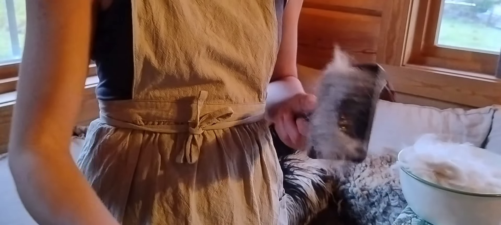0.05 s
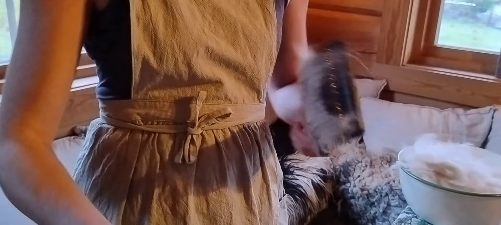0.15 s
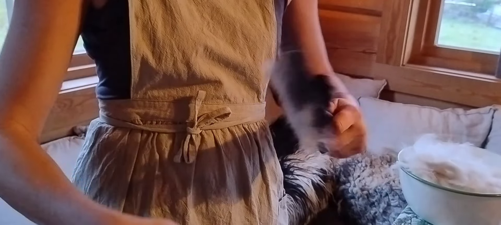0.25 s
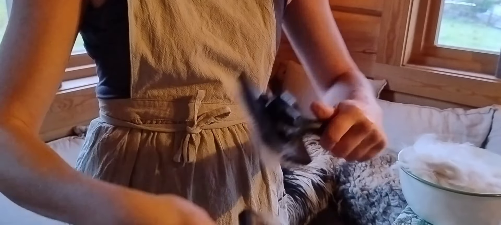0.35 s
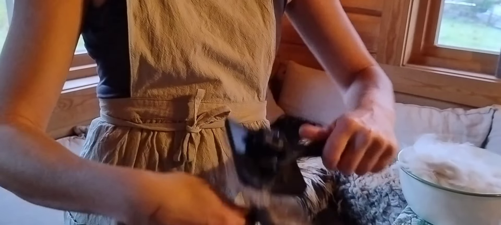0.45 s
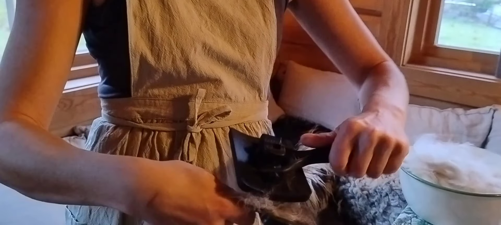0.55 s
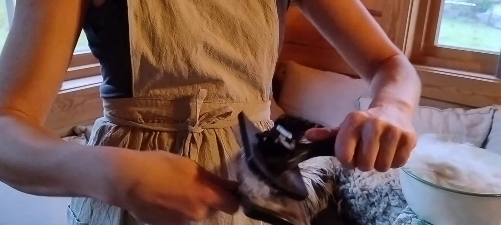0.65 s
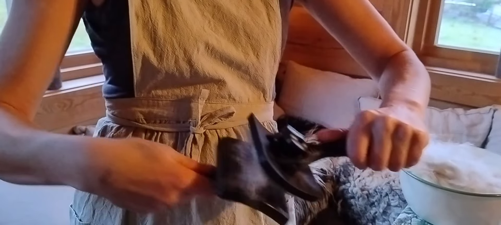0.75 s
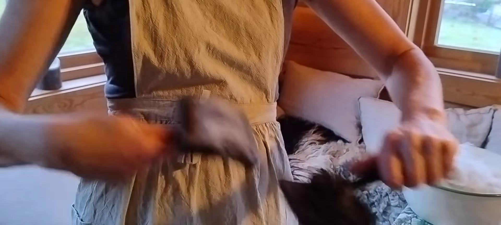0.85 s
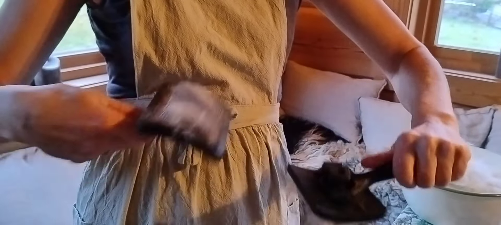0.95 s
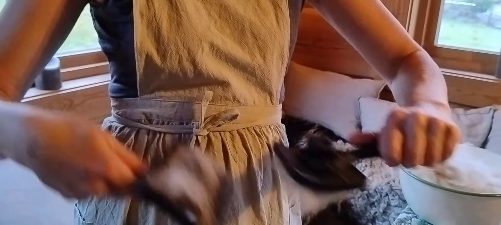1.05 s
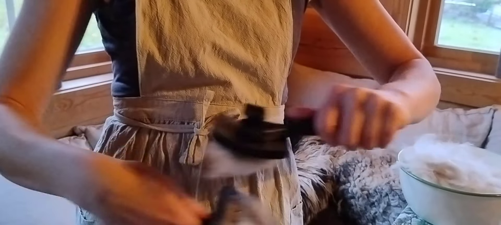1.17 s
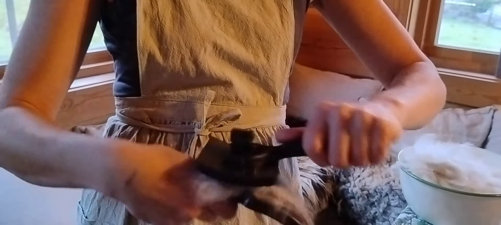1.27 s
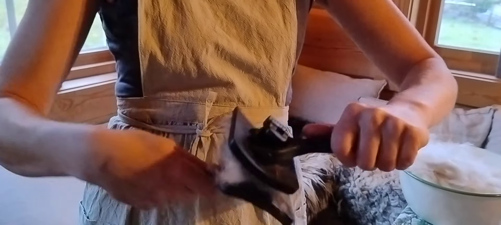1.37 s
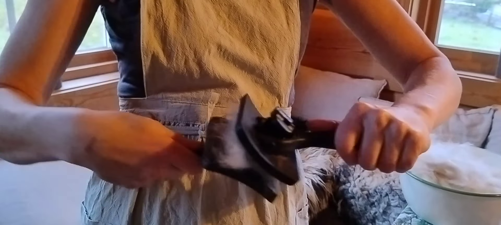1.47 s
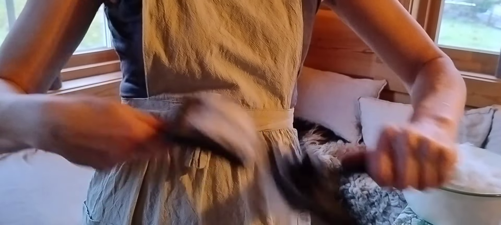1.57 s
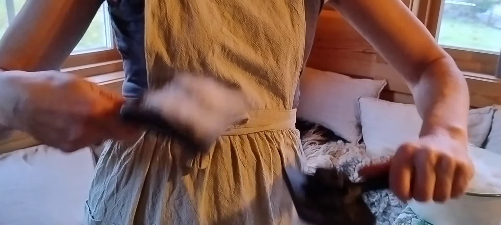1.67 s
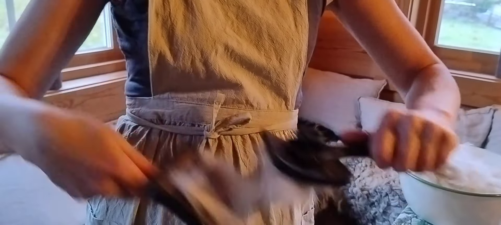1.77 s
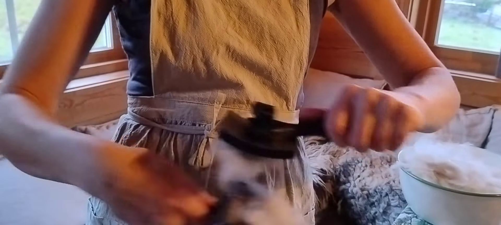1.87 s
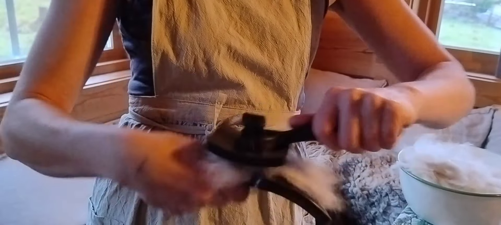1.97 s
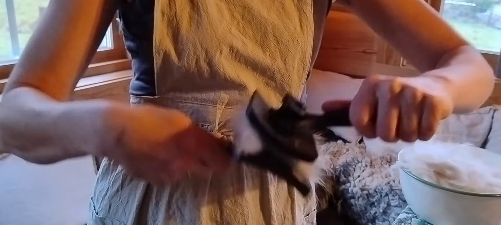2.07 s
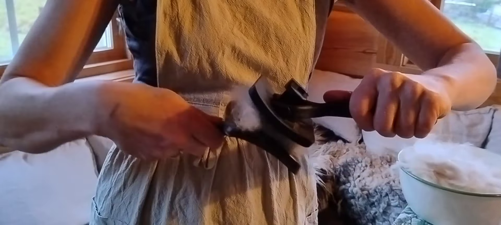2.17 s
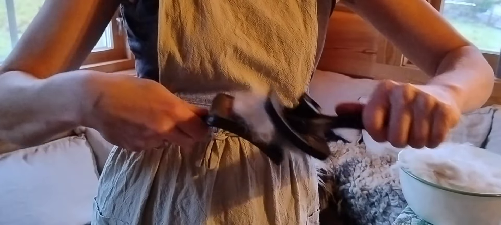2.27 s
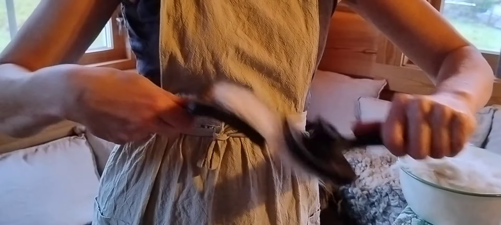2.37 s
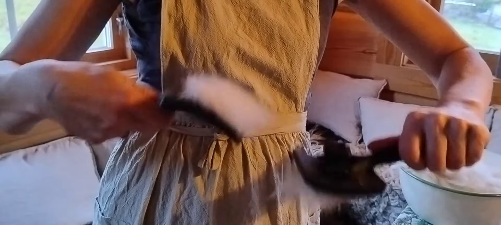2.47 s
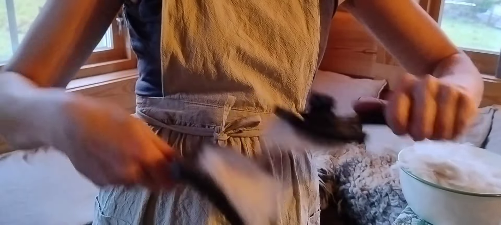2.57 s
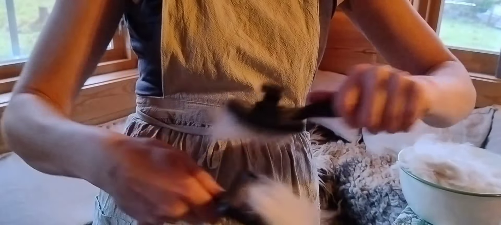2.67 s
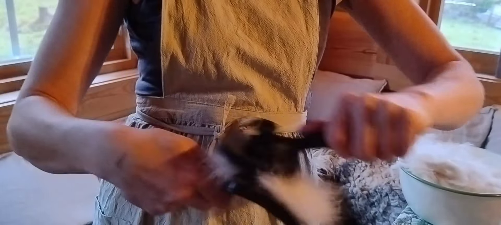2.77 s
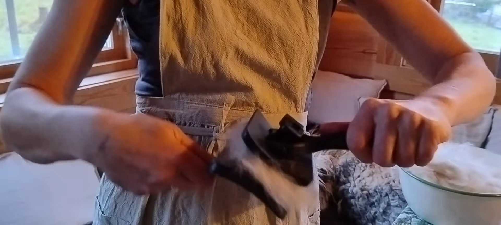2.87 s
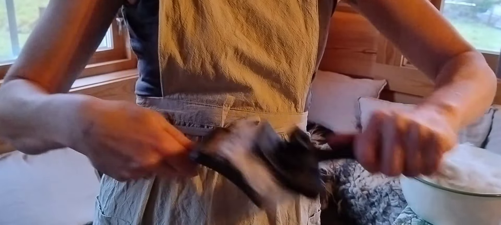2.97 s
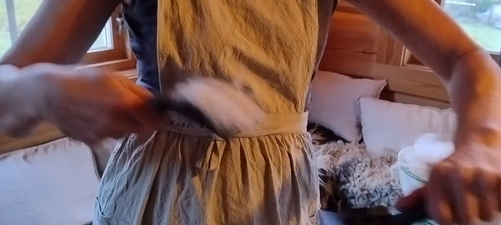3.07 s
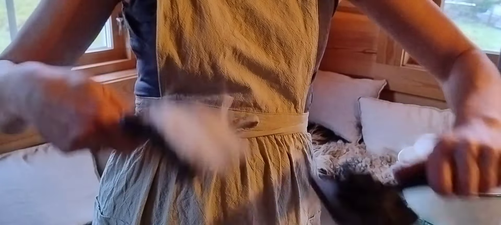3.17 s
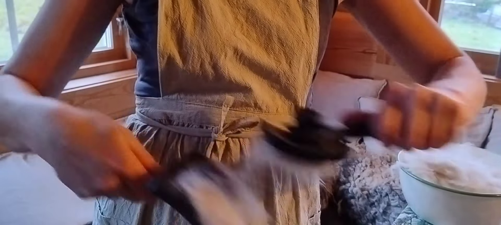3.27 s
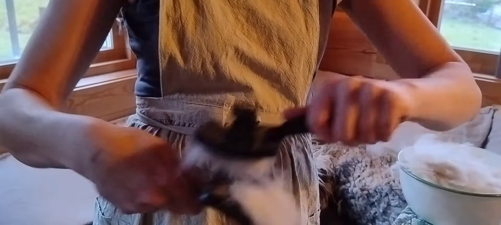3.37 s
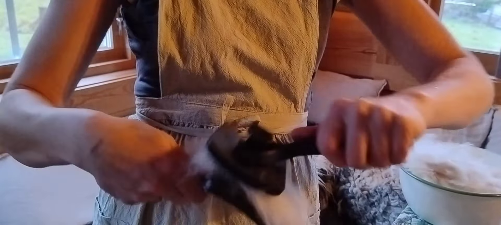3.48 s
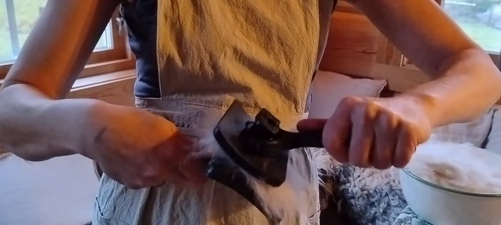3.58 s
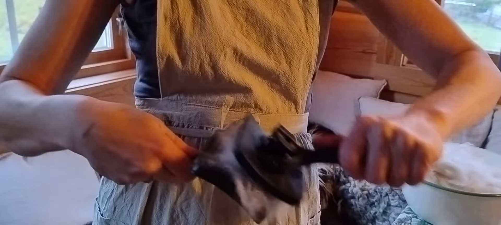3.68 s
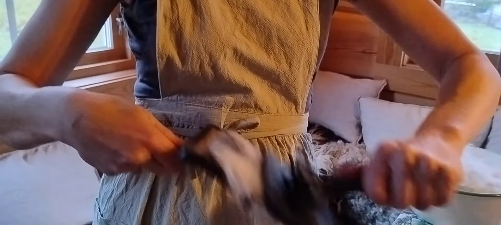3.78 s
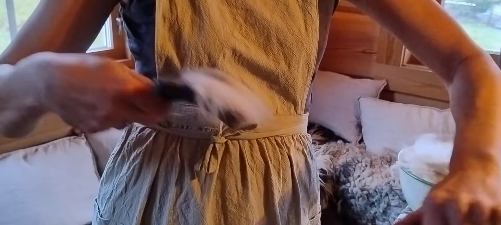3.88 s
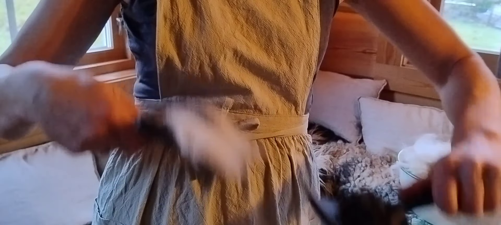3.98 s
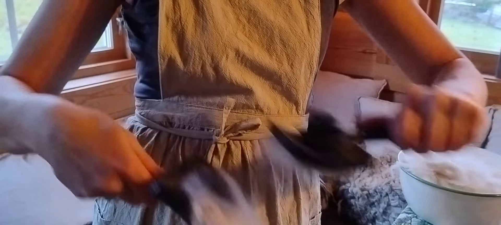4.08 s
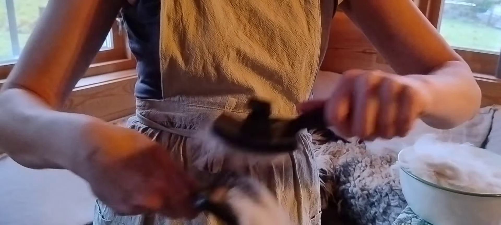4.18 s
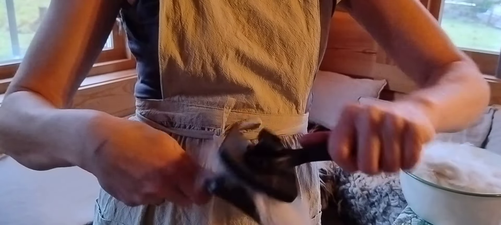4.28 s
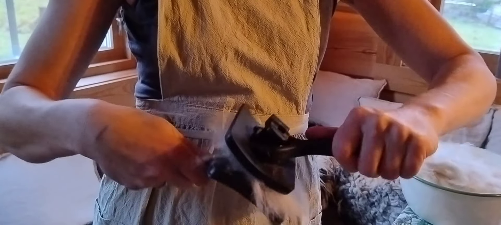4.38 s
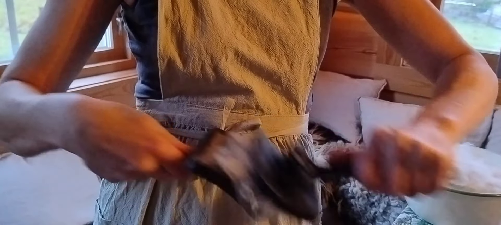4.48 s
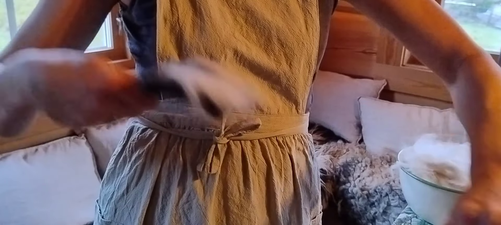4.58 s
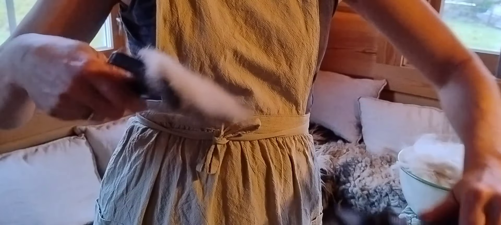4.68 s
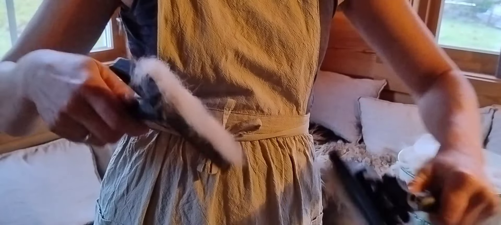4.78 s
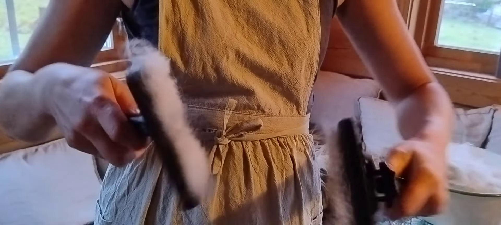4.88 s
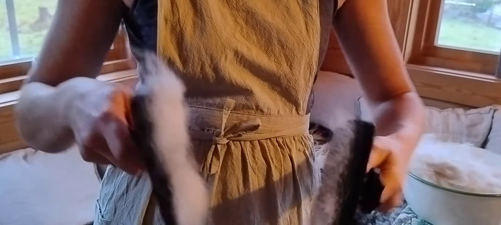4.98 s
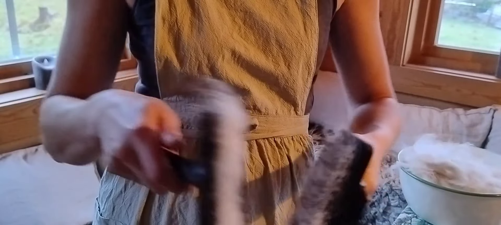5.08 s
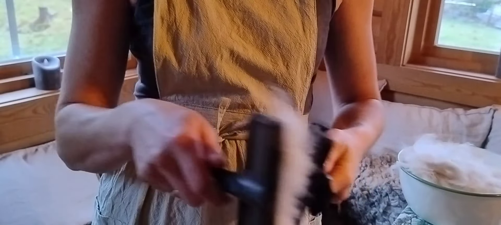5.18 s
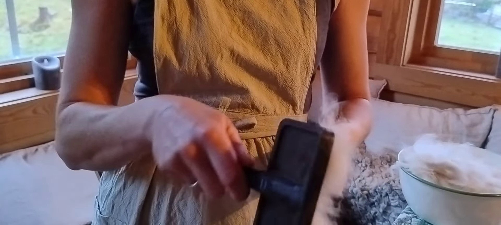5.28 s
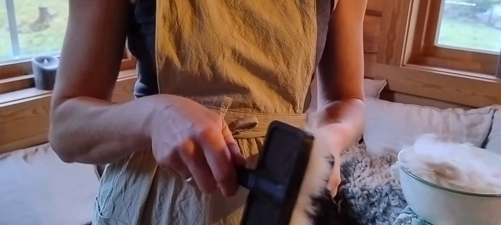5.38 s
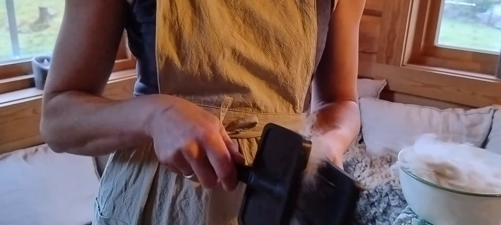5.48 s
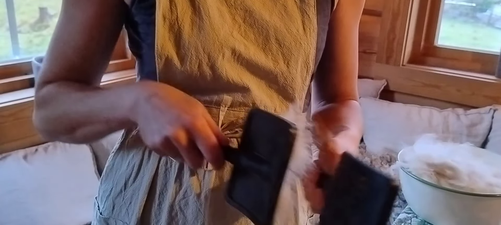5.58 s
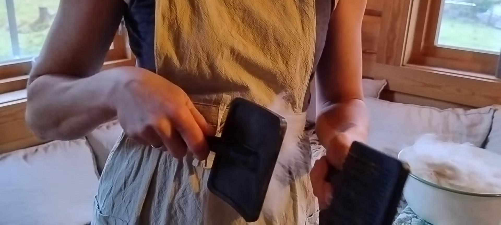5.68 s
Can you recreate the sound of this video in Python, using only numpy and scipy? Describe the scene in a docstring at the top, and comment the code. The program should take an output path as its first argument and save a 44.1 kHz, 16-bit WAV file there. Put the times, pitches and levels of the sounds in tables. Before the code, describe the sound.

Close indoor stereo sound of hand carding with wire brushes. After half a second of quiet come tiny pin grazes, then steady strokes, each clacking, scratching and rasping before a bright release snap. The first two are lighter, the later ones fuller. Quiet gaps show faint cloth rustle, tiny handling creaks and barely audible hum; after a pause, one softer, airy brush glide fades out.

```python
"""Carding fur with two wire-pin brushes

Two brushes card a tuft of fur in a small wooden room, over a low hum, with faint handling and cloth.
In each stroke they clack, the pins scrape in, are drawn back through the fur and let go with a snap;
a last stroke glides. Scrapes are random pin flicks, clacks and snaps are short noise forces, each
passed through a resonant colour; tones are wavering sines, and rustle and air are coloured noise."""
import sys
import numpy as np
from scipy import signal
from scipy.fft import rfft, irfft
from scipy.io import wavfile
from scipy.ndimage import uniform_filter1d

SR = 44100
rng = np.random.default_rng(int(sys.argv[2]) if len(sys.argv) > 2 else 0)


def bounce(signal):
    """Save signal as a 16-bit WAV file at the path given by the first command-line argument."""
    frames = np.transpose(np.atleast_2d(signal))
    limited = np.clip(frames, -1, 1)
    pcm = np.round(limited * 32767).astype(np.int16)
    wavfile.write(sys.argv[1], SR, pcm)


N = 253134
TIME = np.arange(N) / SR  # s

# All table levels are relative: colours, stroke levels and the microphones act on them later.
# Pins push into each other: (start t/s, length t/s, level/dB, sag over length/dB, treble/dB,
# share of bare tips)
PUSHES = [(0.918, 0.029, -28.5, 18, 4.5, 0.31), (1.371, 0.1, -36.5, -3, -5, 0.11),
          (2.062, 0.12, -29, 2.5, -4.5, .1), (2.845, 0.11, -24, 8.5, -6.5, 0.82),
          (3.518, 0.09, -21, 15.5, -4, 0.47), (4.332, 0.11, -26, 16.5, -5.5, 0.94)]
# Pins are drawn back through the fur: (start t/s, swell t/s, hold t/s, release t/s, level/dB,
# treble/dB, treble flare/dB)
PULLS = [(0.738, 0.021, 0.14, 0.14, -42, -7, 8), (1.485, .115, 0.049, 0.22, -38.5, -6.5, 5),
         (2.236, 0.07, 0.078, .33, -34, -5, 1.5), (3.004, .052, .055, 0.096, -30.5, -4, 2),
         (3.683, .07, .155, .11, -30, -5, 5), (4.486, 0.09, 0.021, 0.2, -27.5, -5.5, 6.5)]
# The last, gliding stroke meets the pins, then lifts the fur off them: (columns as in PULLS)
LIFTS = [(5.352, .024, 0.016, 0.42, -40, -1, 4.5), (5.447, 0.092, 0.064, 0.099, -33, -2.5, 0.5)]
# A few pins graze in passing: (centre t/s, length t/s, level/dB, treble/dB)
GRAZES = [(0.596, .012, -47, -2), (0.673, 0.02, -47, 0), (0.702, .03, -50.5, -1.5), (0.749, 0.012, -39, -8),
          (0.915, 0.018, -31, -14.5), (1.446, .022, -40.5, 3), (3.908, .022, -30.5, 5),
          (5.343, 0.027, -57.5, 4.5)]
# Brushes meet, or a pin catches: (t/s, level/dB, length t/ms, tilt/dB per octave above 1 kHz,
# ring of the plastic back/dB)
CLACKS = [(0.7469, -28.5, 0.25, -1, -2.5), (0.9288, -14, 1, 13.5, 7), (1.3866, -20, 0.93, 0, 1.5),
          (2.0755, -13.5, 0.47, 4, -1), (2.0810, -18, .3, 1.5, -0.5), (2.8588, -18, .27, -0.5, 7),
          (2.8610, -23, 0.32, 1.5, 0.5), (2.8662, -13.5, 0.32, 4, -1.5), (2.9040, -22.5, 0.13, 0, -5),
          (3.5286, -18.5, 0.58, -4, -3.5), (3.5329, -12.5, 0.53, 2, -1), (3.7265, -27.5, 0.2, 3, 5),
          (4.3465, -10.5, .4, 1.5, -1.5)]
# The last pins let go: (columns as in CLACKS)
SNAPS = [(0.9713, -20.5, 1, -2, -3), (1.7261, -13, .5, -1, -1), (2.5305, -19, .9, -2.5, -5.5),
         (3.1650, -13.5, .5, -1, 1), (3.9530, -12.5, 0.93, -0.5, 1.5), (4.6623, -12, .6, -0.5, -3.5)]
# Colours of the pushing, pulling and gliding pins: (f/Hz, level/dB per Hz)
PUSH_COLOUR = [(240, -51), (400, -20.5), (557, -14), (942, -15), (1030, -5.5), (1110, -14), (1200, -4.5),
               (1370, -5.5), (1570, -3), (1820, -3.5), (2950, -1.5), (7380, -7.5), (8570, -10),
               (13300, -17), (14500, -24)]
PULL_COLOUR = [(240, -49), (400, -14.5), (548, -19.5), (667, -15.5), (1020, -2.5), (1150, -6), (1390, 0),
               (1690, -3), (2000, -0.5), (2950, 1.5), (5220, -5), (7950, -7), (9520, -14), (12300, -15.5),
               (14500, -24.5)]
LIFT_COLOUR = [(240, -44), (400, -17), (438, -29), (574, -35), (775, -19.5), (1000, -15.5), (1310, -16),
               (2500, -5), (4040, -11), (5980, -9), (7830, -14.5), (13700, -23.5), (14500, -32)]
# Colours of the brushes as they meet and as they let go: (f/Hz, level/dB per Hz)
CLACK_COLOUR = [(100, -36.5), (400, -31.5), (750, -20), (930, -17.5), (1250, -13.5), (1700, -14),
                (2100, -2), (3200, -6.5), (4500, -1), (6000, -9), (8000, -16.5), (10000, -20),
                (14000, -23.5)]
SNAP_COLOUR = [(40, -37.5), (150, -20.5), (550, -25), (730, -24), (1020, -26.5), (1190, -7), (1330, -10),
               (1620, -15.5), (2000, -3), (2300, 2.5), (3000, -7), (5000, -9), (7500, -12.5),
               (10000, -18.5), (14000, -22)]
# What the knocked pin bed sends out to all sides: (f/Hz, level/dB per Hz)
SPILL_COLOUR = [(100, -30.5), (500, -19), (900, -12), (1200, -3), (1700, -4.5), (2200, -3.5), (3200, -7.5),
                (4500, -3), (7000, -8), (10000, -14.5), (14000, -20.5)]
# Level difference of the microphone pair: (f/Hz, left minus right level/dB)
SIDES = [(60, -2), (1000, -0.5), (2000, 0.5), (3800, 2), (5200, -3), (6200, 1), (8000, -5.5), (10500, -6),
         (14000, -3.5)]
# Early echoes from near surfaces: (delay t/s, left gain, right gain)
ECHOES = [(.0024, .12, 0.033), (.0059, 0.28, 0.095), (.0085, .06, .08), (0.0127, 0.056, 0.055)]
# Decay of the room: (f/Hz, time to fall by 60 dB t/s)
ROOM_DECAY = [(200, 0.47), (1000, 0.056), (2500, 0.27), (5000, 0.21), (9000, 0.2), (14000, 0.15)]
# Rustle of the apron: (t/s, level/dB)
RUSTLE = [(.55, -64.5), (1.3, -57.5), (4.2, -55.5), (4.9, -53.5), (5.2, -60)]
# Colour of the cloth: (f/Hz, level/dB per Hz)
RUSTLE_COLOUR = [(100, -0.5), (900, 6.5), (2200, -3), (4500, -7.5), (8000, -13.5), (14000, -20)]
# Faint creaks of the brushes in the hands: (centre t/s, length t/s, f/Hz, level/dB)
CREAKS = [(0.793, 0.044, 560, -52.5), (0.964, 0.089, 646, -47), (4.758, 0.047, 585, -44.5),
          (4.779, 0.016, 660, -37), (4.817, 0.025, 670, -45), (4.998, 0.033, 650, -40)]
# Soft bumps of handling: (centre t/s, length t/s, f/Hz, level/dB)
BUMPS = [(2.183, 0.029, 150, -55), (2.203, 0.026, 108.2, -48), (2.517, 0.12, 144.6, -50.5)]
# Thin faint tones: (start t/s, end t/s, f/Hz, level/dB, fade/dB per s)
WHINES = [(0, 0.447, 2560, -67.5, 11), (0, .33, 4000, -84, 10), (0, .35, 4900, -88, 10),
          (1.08, 1.4, 2595, -70.5, -2), (1.122, 1.38, 3120, -85, 0), (4.167, 4.335, 3300, -74, -5),
          (4.22, 4.34, 4450, -81, 5.5), (4.955, 5.35, 3260, -77, 9), (4.995, 5.35, 4167, -73.5, 13),
          (5.08, 5.354, 5658, -80, -7)]
# Lines of the machine hum: (f/Hz, level/dB)
HUM = [(84.2, -52), (119, -70), (183, -66), (272, -56), (576, -63)]
# Colour of the air of the room: (f/Hz, level/dB per Hz)
AIR_COLOUR = [(20, -17.5), (50, -8), (90, 0.5), (160, 0.5), (210, 0.5), (295, 5), (370, -7), (560, -3),
              (750, -11.5), (930, -16), (1300, -36), (2200, -29), (4000, -44.5), (14000, -43)]

PUSH_ATTACK_S, PUSH_RELEASE_S = 0.017, 0.23
BITE_S = 0.035  # bare tips ring most at this time after they meet
PULL_SAG_DB_PER_S, SWELL_POWER = 29.5, 1.2
FLARE_S = 0.0092  # half-width of the treble flare, to 1/e
FIZZ_HZ = 5000  # the scrape's treble lies above this
BACK_HZ, BACK_WIDTH_HZ = 2280, 400  # main resonance of a brush back
AIR_DB = -52.5
EDGE_HZ = 14700  # upper band limit


def scrape(strokes, colour, pins_per_s, spread_db, catch_db, lead_ms, width_ms, level_db):
    """Stick-slip friction: wire pins flick past each other at random, catching and slipping in clumps."""
    size = amp(spread_db * np.minimum(rng.exponential(1, N), 4))
    happens = rng.random(N) < pins_per_s / SR
    flicks = size * rng.choice([-1, 1], N) * happens
    clumped = flicks * amp(catch_db * drift(160))
    pins = ring(arrive(clumped, lead_ms, width_ms), colour)
    body = unit_rms(band(pins, 0, FIZZ_HZ))
    fizz = unit_rms(band(pins, FIZZ_HZ, SR))
    tips = band(body, 2900, SR) - 0.3 * body  # more ring, less thrum
    total = np.zeros((2, N))
    for gain, treble_db, bare in strokes:
        total += gain * (body + bare * tips + amp(treble_db) * fizz)
    return amp(level_db) * total


def push(start, length, db, sag_db, treble_db, bite):
    """Damping by immersion: pins hit and quieten as they sink in. Gives gain, treble dB, bare tips."""
    depth = np.maximum(TIME - start, 0) / BITE_S
    bare = bite * depth * np.exp(1 - depth)
    gain = amp(db) * envelope(start, PUSH_ATTACK_S, length, PUSH_RELEASE_S, sag_db)
    return gain, treble_db, bare


def pull(start, swell, hold, release, db, treble_db, flare_db):
    """Sliding friction: the rasp swells, sags, and turns bright just as the pins slip."""
    slipping = np.exp(-((TIME - start - swell - hold) / FLARE_S) ** 2)
    gain = amp(db) * envelope(start, swell, hold, release, PULL_SAG_DB_PER_S * hold)
    return gain, treble_db + flare_db * slipping, 0


def graze(centre, length, db, treble_db):
    """Passing contact: a brief touch that comes and goes evenly, as a Gaussian."""
    return amp(db) * np.exp(-(2 * (TIME - centre) / length) ** 2), treble_db, 0


def envelope(start, attack_s, hold_s, release_s, sag_db):
    """Contact pressure: it builds, sags while held, then dies by 60 dB over each release time."""
    age = TIME - start - attack_s
    rise = np.clip(1 + age / attack_s, 0, 1) ** SWELL_POWER
    sag = amp(-sag_db * np.clip(age / hold_s, 0, 1))
    release = 1e-3 ** (np.maximum(age - hold_s, 0) / release_s)
    return rise * sag * release


def turning(x, patchy_db):
    """Moving radiator: as the brushes turn and slide, their colour shifts in narrow, slow bands."""
    spectrum = signal.stft(x, SR, nperseg=512)[2]
    patches = rng.standard_normal(spectrum.shape[1:])
    patches = uniform_filter1d(patches, size=3, axis=0)  # across frequency
    patches = unit_rms(uniform_filter1d(patches, size=9, axis=1))  # across time
    gain = unit_rms(amp(patchy_db * patches))
    return signal.istft(spectrum * gain, SR, nperseg=512)[1][:, :N]


def knocks(rows, colour, build_ms, build_db, lead_ms, width_ms, level_db, spill_db):
    """Impact excitation: scattered pins surround the bed's burst. Gives direct sound and room spill."""
    near, spill = np.zeros((2, N)), np.zeros(N)
    ms = (np.arange(2048) - 512) * 1000 / SR
    burst = np.sqrt(0.003 * SR / len(ms))  # levels refer to the rms over 3 ms
    for s, db, length_ms, tilt_db, back_db in rows:
        start = s + ms[0] / 1000
        bed = np.exp(-0.5 * (ms / length_ms) ** 2)
        bed = bed + amp(build_db) * np.exp(-abs(ms) / build_ms)
        force = arrive(bed * rng.standard_normal(len(ms)), lead_ms, width_ms)
        lines = rfft(force)
        force = irfft(lines / abs(lines) ** 0.21)  # so many pins hardly favour a pitch
        force = force * np.exp(-(ms / 5.5) ** 2)
        struck = unit_rms(ring(force, colour, tilt_db, back_db))
        for channel, sound in enumerate(struck):
            add(near[channel], start, amp(db + level_db) * burst * sound)
        impulse = signal.unit_impulse(len(ms))
        spread = unit_rms(ring(impulse, SPILL_COLOUR, tilt_db, back_db)[0])
        add(spill, s, amp(db + spill_db) * burst * spread)
    return near, spill


def ring(x, colour, tilt_db=0, back_db=0, size=2048):
    """Minimum-phase resonance: a coloured body rings only after it is struck."""
    hz = abs(np.fft.fftfreq(size, 1 / SR))
    back = back_db * np.exp(-((hz - BACK_HZ) / BACK_WIDTH_HZ) ** 2)
    tilt = tilt_db * np.log2(np.maximum(hz, 1000) / 1000)
    log_gain = np.log(amp(read_spectrum(colour, hz) + back + tilt))
    response = np.fft.ifft(np.exp(np.conj(signal.hilbert(log_gain)))).real
    return signal.oaconvolve(np.atleast_2d(x), response[None], axes=1)[:, :x.shape[-1]]


def arrive(flicks, lead_ms, width_ms):
    """Path difference: pins lie across the brush, so each reaches the right microphone at its own delay."""
    size = len(flicks)
    delay_ms = lead_ms + width_ms * rng.standard_normal(size)
    at = np.arange(size) + np.round(delay_ms * SR / 1000).astype(int)
    return np.array([flicks, np.bincount(at % size, flicks, size)])


def direct(x):
    """Direct path and early reflection: each microphone has its colour, and near surfaces echo it."""
    half = amp(read_spectrum(SIDES, np.fft.rfftfreq(N, 1 / SR)) / 2)
    near = irfft(rfft(x) * np.array([half, 1 / half]), N)
    out = near.copy()
    for delay_s, *gains in ECHOES:
        for channel, gain in enumerate(gains):
            add(out[channel], delay_s, gain * near[channel])
    return out


def room(x, shared_hz, onset_s, late_db, late_t60, size=26000):
    """Reverberation: decaying noise with a faint longer tail, alike at both microphones in the bass only."""
    hz, t, noise = signal.stft(rng.standard_normal((3, size)), SR, nperseg=256)
    alike = np.exp(-(hz[:, None] / shared_hz) ** 2)
    pair = np.sqrt(1 - alike) * noise[:2] + np.sqrt(alike) * noise[2]
    decay = amp(-60 * t / read_spectrum(ROOM_DECAY, hz)[:, None])
    decay = decay + amp(late_db - 60 * t / late_t60)
    tail = signal.istft(pair * decay, SR, nperseg=256)[1]
    tail *= np.minimum(TIME[:tail.shape[1]] / onset_s, 1) ** 2
    tail /= np.linalg.norm(tail, axis=1, keepdims=True)
    return signal.fftconvolve(x[None], tail, axes=1)[:, :N]


def rustle(flutter_db):
    """Friction noise of cloth: the apron shifts softly with the arms, as coloured noise."""
    level_db = np.interp(TIME, *np.transpose(RUSTLE)) + flutter_db * drift(25)
    return amp(level_db) * unit_rms(ring(rng.standard_normal((2, N)), RUSTLE_COLOUR))


def creaks(waver):
    """Frequency modulation: handling of the brushes gives short tones that waver together."""
    out, wobble = np.zeros(N), 1 + waver * drift(120)
    for centre, length, hz, db in CREAKS + BUMPS:
        swell = np.exp(-(2 * (TIME - centre) / length) ** 2)
        tone = np.sin(2 * np.pi * hz * np.cumsum(wobble) / SR)
        out += amp(db) * swell * unit_rms(tone)
    return out


def whines(waver, flutter_db):
    """Phase-modulated sines: faint thin tones come and go with a shared flutter."""
    out = np.zeros(N)
    for start, end, hz, db, fade in WHINES:
        gate = 1.0 * ((TIME > start) & (TIME < end))
        sounding = uniform_filter1d(gate, size=3500)
        level = amp(db - fade * np.clip(TIME - start, 0, end - start))
        tone = np.sin(2 * np.pi * hz * TIME + waver * drift(28))
        out += level * sounding * unit_rms(tone)
    return out * amp(flutter_db * drift(22))


def hum(waver, flutter_db):
    """Line spectrum: a low machine hum whose phase wavers more in the higher lines."""
    out = np.zeros(N)
    for hz, db in HUM:
        level = amp(db + flutter_db * drift(24))
        phase = waver * hz / HUM[0][0] * drift(21)
        out += level * unit_rms(np.sin(2 * np.pi * hz * TIME + phase))
    return out


def air(apart):
    """Partly coherent noise: soft room air, mostly shared by the two microphones."""
    noise = unit_rms(ring(rng.standard_normal((3, N)), AIR_COLOUR, size=8192))
    return amp(AIR_DB) * (noise[2] + apart * noise[:2])


def amp(db):
    """Level definition: decibels to amplitude gain."""
    return 10 ** (np.asarray(db) / 20)


def unit_rms(x):
    """Power normalisation: scales to rms 1."""
    return x / np.sqrt(np.mean(x ** 2) + 1e-20)


def read_spectrum(points, hz):
    """Interpolation: reads a tabulated spectrum on a log-frequency axis."""
    f, value = np.transpose(points)
    return np.interp(np.log(hz + 1), np.log(f + 1), value)


def add(mix, s, sound):
    """Superposition: mixes a sound in at time s."""
    part = mix[max(round(s * SR), 0):][:len(sound)]
    part += sound[:len(part)]


def band(x, lo_hz, hi_hz):
    """Zero-phase filtering: keeps one band, without delay."""
    hz = np.fft.rfftfreq(N, 1 / SR)
    return irfft(rfft(x) * ((hz >= lo_hz) & (hz < hi_hz)), N)


def drift(rate_hz):
    """Low-passed noise: slow random variation of rms 1."""
    return unit_rms(band(rng.standard_normal(N), 0, rate_hz))


def scene():
    """Superposition: the brushes in the room, over its hum."""
    touches = [push(*row) for row in PUSHES] + [graze(*row) for row in GRAZES]
    scrapes = scrape(touches, PUSH_COLOUR, pins_per_s=3200, spread_db=3.0, catch_db=1.0,
                     lead_ms=-0.098, width_ms=0.095, level_db=-2.0)
    scrapes += scrape([pull(*row) for row in PULLS], PULL_COLOUR, pins_per_s=12000, spread_db=1.0,
                      catch_db=1.3, lead_ms=-0.078, width_ms=0.034, level_db=-0.5)
    scrapes += scrape([pull(*row) for row in LIFTS], LIFT_COLOUR, pins_per_s=7700, spread_db=-5,
                      catch_db=-1.0, lead_ms=-0.01, width_ms=0.022, level_db=0.0)
    scrapes = turning(scrapes, patchy_db=2.1)
    clacks, clack_spill = knocks(CLACKS, CLACK_COLOUR, build_ms=0.94, build_db=-17, lead_ms=-0.11,
                                 width_ms=0.019, level_db=1.0, spill_db=-6.0)
    snaps, snap_spill = knocks(SNAPS, SNAP_COLOUR, build_ms=7.0, build_db=-8.0, lead_ms=0.036,
                               width_ms=0.015, level_db=2, spill_db=-2.5)
    spill = amp(-7.0) * scrapes[0] + clack_spill + snap_spill
    brushes = direct(scrapes + clacks + snaps)
    brushes = brushes + room(spill, shared_hz=830, onset_s=0.0042, late_db=-32, late_t60=0.37)
    handling = rustle(flutter_db=1.5) + creaks(waver=0.05)
    tones = whines(waver=0.18, flutter_db=2.3) + hum(waver=0.04, flutter_db=0.4)
    return brushes + handling + tones + air(apart=0.29)


def suppress(x, open_db, range_db, bass_db, treble_db):
    """Downward expansion: sound is turned down when the left treble falls quiet, most of all below 900 Hz."""
    power = signal.lfilter(np.ones(900) / 900, 1, band(x[0], 1000, SR) ** 2)  # mean of the last 20 ms
    treble_level_db = 10 * np.log10(abs(power) + 1e-14)
    quiet = np.clip((open_db - treble_level_db) / range_db, 0, 1)
    bass = band(x, 0, 900)
    return bass * amp(-bass_db * quiet) + (x - bass) * amp(-treble_db * quiet)


def record(dry):
    """Transducer chain: noise suppression, the microphone's bass cut, soft overload, then the band limit."""
    sound = suppress(dry, open_db=-29.5, range_db=31.5, bass_db=14.0, treble_db=9.5)
    bass_cut = signal.butter(2, 52, "highpass", fs=SR, output="sos")
    sound = signal.sosfilt(bass_cut, sound)
    sound = sound / (1 + (sound / 0.88) ** 6) ** (1 / 6)  # bends towards 0.88
    band_limit = signal.firwin(201, EDGE_HZ, window=("kaiser", 9), fs=SR)
    return signal.oaconvolve(sound, band_limit[None], "same")


dry = scene()
out = record(dry)
bounce(out)
```